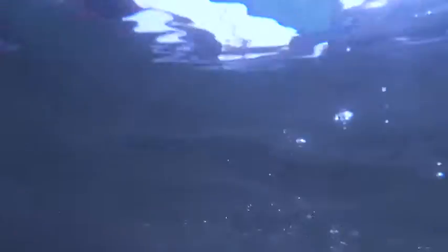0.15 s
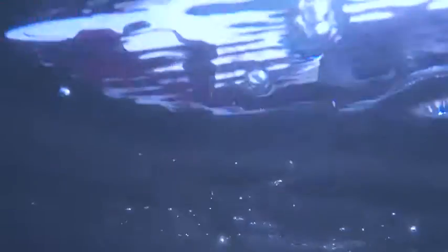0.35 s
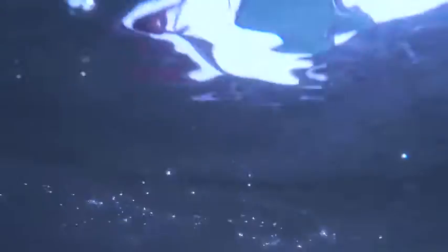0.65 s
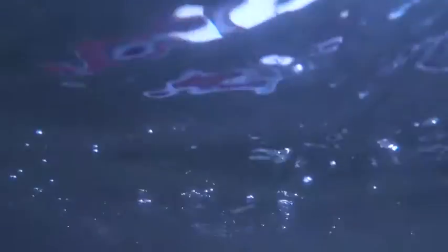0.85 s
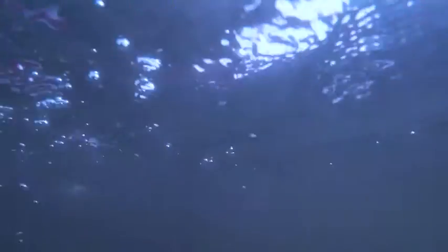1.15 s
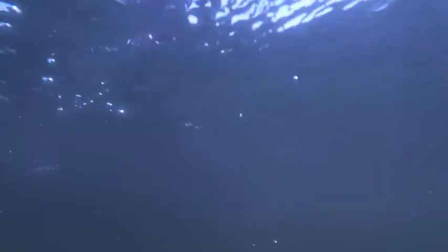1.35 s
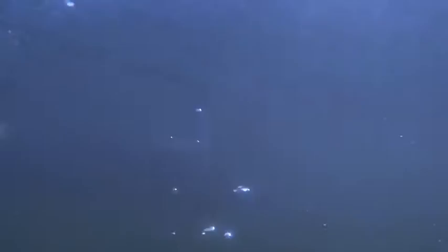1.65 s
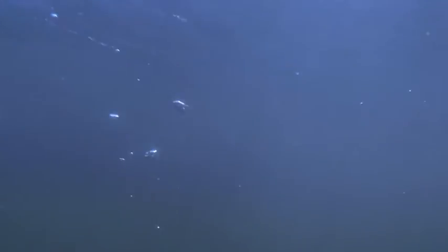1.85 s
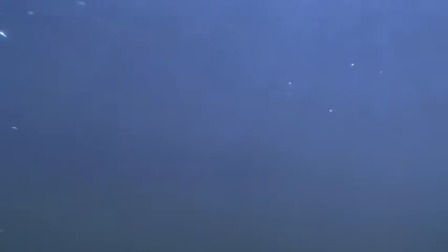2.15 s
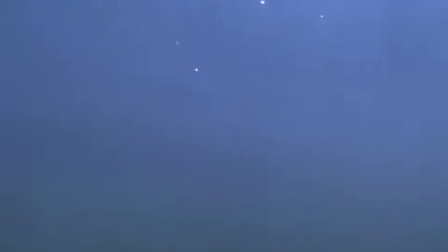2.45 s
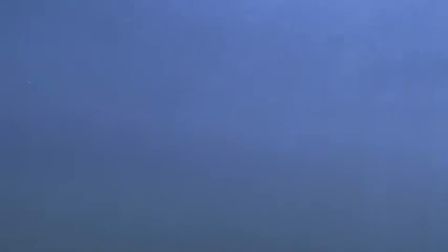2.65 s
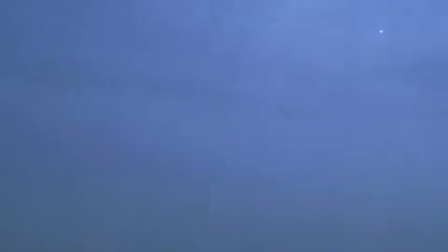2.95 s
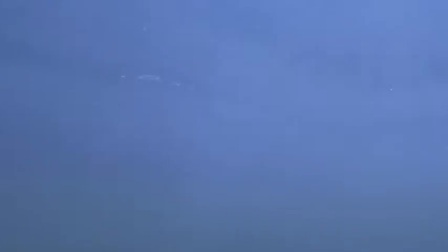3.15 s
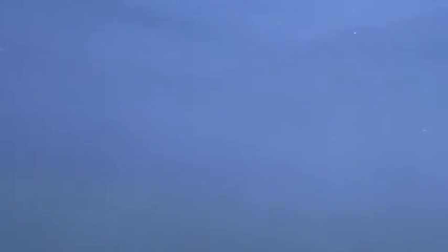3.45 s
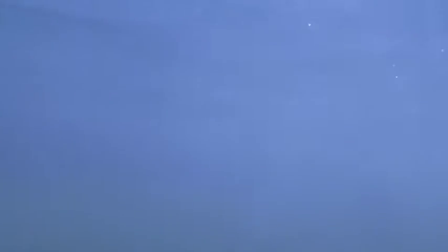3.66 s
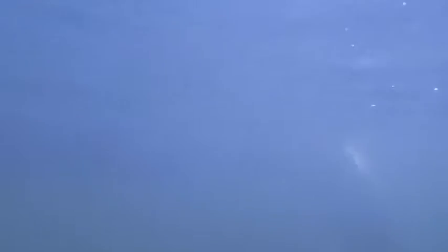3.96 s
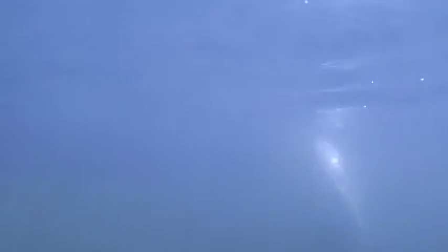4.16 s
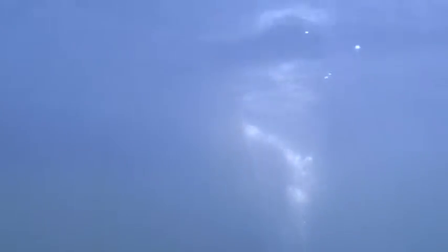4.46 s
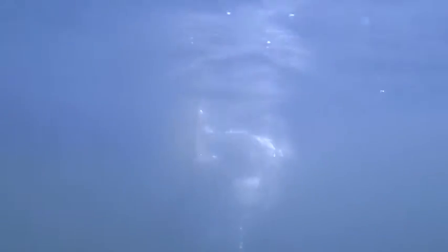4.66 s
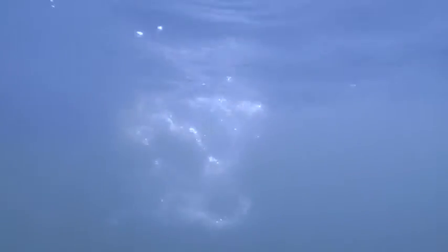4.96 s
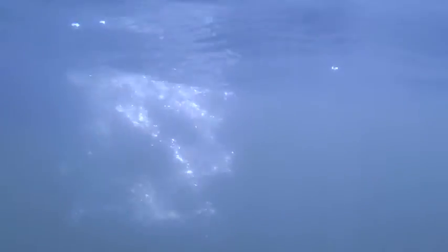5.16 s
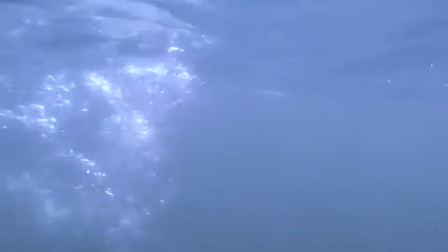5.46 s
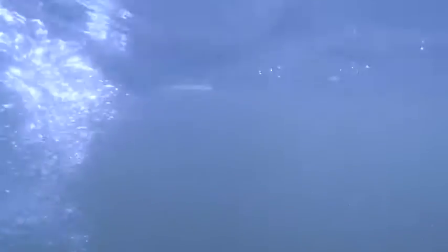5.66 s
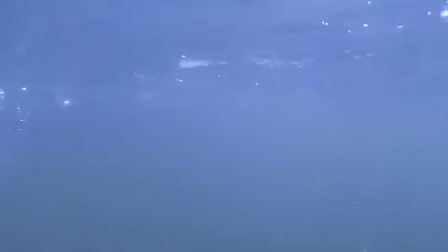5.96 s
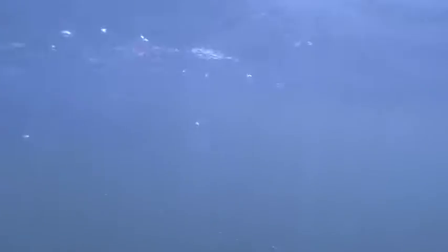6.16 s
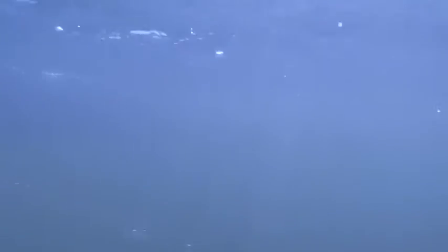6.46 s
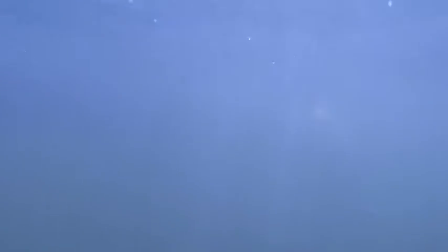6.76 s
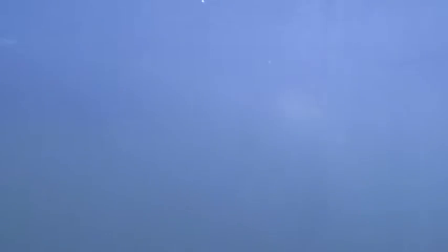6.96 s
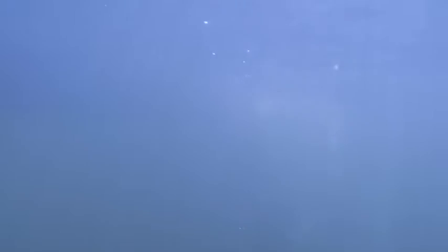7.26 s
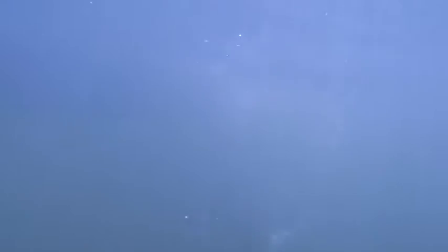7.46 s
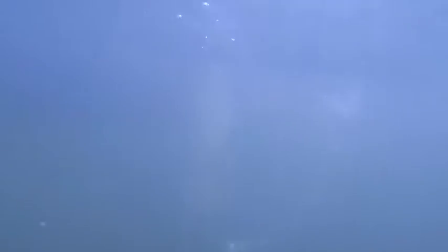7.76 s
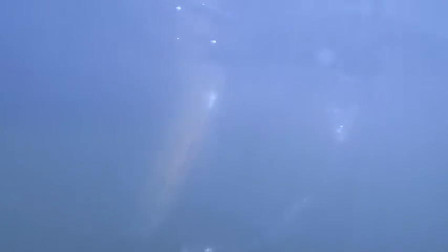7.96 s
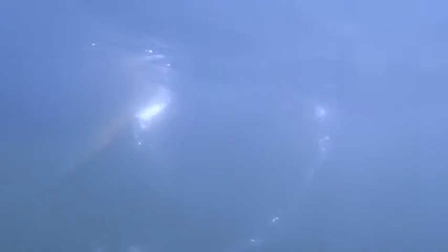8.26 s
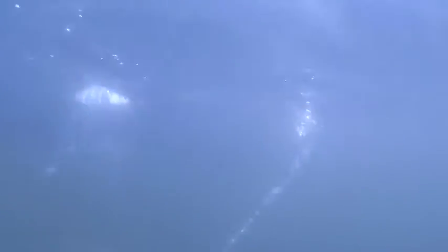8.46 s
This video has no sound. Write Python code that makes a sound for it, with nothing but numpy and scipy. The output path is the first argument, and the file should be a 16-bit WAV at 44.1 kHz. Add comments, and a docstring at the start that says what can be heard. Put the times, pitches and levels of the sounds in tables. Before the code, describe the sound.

Close, muffled and boxy underwater sound: round bubble plops, small high blips, dull gurgles and soft watery fizz, with knocks and ticks against the housing. The first half bubbles actively in surges, then thins to quiet streaming. A cracking click and the loudest thud break the calm; the water almost falls silent, then light ticks, clicks and increasingly dense bubbles swell through to the end.

```python
"""Bubbles ring one by one under water, close to a microphone in a sealed camera housing.
It is dragged through the wake beside a boat being paddled. Small blows knock and tick on the housing,
whose air space colours them and the gurgle with fixed resonances. Behind them the water streams,
crackles, fizzes and heaves as shaped noise and random bubbles, over faint preamplifier hiss and whine."""
import sys
import numpy as np
from scipy import signal
from scipy.fft import rfft, irfft, next_fast_len
from scipy.io import wavfile
from scipy.ndimage import uniform_filter1d, map_coordinates

SR = 44100
rng = np.random.default_rng(int(sys.argv[2]) if len(sys.argv) > 2 else 0)


def master_out(mix):
    """Clip the mix to full scale and print it as 16-bit PCM to the path in sys.argv[1]."""
    frames = np.transpose(np.atleast_2d(mix))
    ceiling = np.clip(frames, -1, 1)
    pcm = np.round(ceiling * 32767).astype(np.int16)
    wavfile.write(sys.argv[1], SR, pcm)


N = 379701
T = np.arange(N) / SR

# Blunt blows on the housing: start_s, level_db (push before the resonances)
KNOCKS = [(0.326, -42), (0.514, -36.5), (.639, -28.5), (1.054, -23.5), (1.429, -30), (1.515, -44),
          (1.644, -46.5), (1.708, -27.5), (1.802, -33), (1.859, -26), (1.987, -41), (2.147, -23.5),
          (2.475, -27.5), (2.623, -32.5), (2.901, -44), (3.421, -34), (3.574, -42.5), (3.853, -38.5),
          (5.058, -26), (5.207, -50.5), (5.709, -38.5), (5.797, -15.5), (6.392, -45), (6.59, -43.5),
          (6.762, -46), (6.9, -46.5), (7.159, -39), (7.91, -44), (7.939, -39.5), (7.998, -43), (8.281, -43),
          (8.389, -44), (8.443, -31.5), (8.521, -32.5)]
# Water streaming past: start_s, level_db (before its random ripple)
STREAM = [(0, -67), (.4, -77), (.8, -84), (1.5, -75.5), (1.9, -73), (2.04, -67.5), (2.17, -55.5),
          (2.3, -71), (2.86, -76.5), (2.95, -59), (3.1, -71), (3.9, -66), (4.2, -66), (4.8, -66),
          (5.6, -70.5), (6.1, -77.5), (6.2, -93), (6.8, -79.5), (7.6, -69.5), (7.9, -62.5), (8.2, -62),
          (8.61, -54)]
MID_DB = -67  # gurgle and crackle swing about this level of stirring or streaming


def amp(db):
    """Decibels to amplitude."""
    return 10 ** (np.asarray(db) / 20)


def unit(x):
    """Scale to rms 1."""
    return x / np.sqrt(np.mean(x ** 2) + 1e-20)


def along(points, hz):
    """Read a curve of (Hz, value) points on a log frequency axis."""
    f, v = np.transpose(points)
    return np.interp(np.log(hz + 1), np.log(f + 1), v)


def flow(index):
    """One column of the water's changing motion, per sample."""
    # Motion against the housing: start_s, heave_db, stirring_db, fizz_db
    motion = [(0, -33, -67, -85), (0.248, -37, -58, -81), (0.799, -36, -76, -82), (1.3, -38.5, -70.5, -84),
              (1.5, -36, -62.5, -80.5), (1.98, -36, -66, -81.5), (2.141, -32, -54, -78.5),
              (2.27, -40, -67, -81), (2.7, -35.5, -59, -81.5), (3.15, -39, -68.5, -82),
              (3.8, -38.5, -63.5, -81.5), (4.299, -39.5, -74, -81.5), (4.77, -37.5, -63.5, -79),
              (5.3, -35.5, -65.5, -80.5), (5.901, -40.5, -68, -81.5), (6.1, -45, -72, -83),
              (6.199, -48.5, -94, -105), (6.799, -45.5, -67.5, -94.5), (7.499, -41, -76.5, -82.5),
              (7.85, -35.5, -58, -81.5), (8.61, -37.5, -54, -80)]
    columns = np.transpose(motion)
    return np.interp(T, columns[0], columns[index])


def wobble(rate):
    """A smooth random curve with rate knots a second."""
    knots = rng.standard_normal(int(N * rate / SR) + 4)
    return map_coordinates(knots, [T * rate])


def filtered(x, response):
    """Filter x by a complex response of frequency."""
    m = next_fast_len(N + SR // 2)
    return irfft(rfft(x, m) * response(np.fft.rfftfreq(m, 1 / SR)), m)[:N]


def mode(f, hz, width_hz):
    """A causal resonance of peak gain 1."""
    return 1j * f * width_hz / (hz * hz - f * f + 1j * f * width_hz + 1e-9)


def housing(f):
    """The housing's air space: resonances summed with alternating sign."""
    # Resonances: centre_hz, width_hz, relative_level_db
    resonances = [(314, 71, 0), (930, 460, -2), (1300, 520, 2), (3000, 1500, -35)]
    return sum((-1) ** k * amp(db) * mode(f, hz, width) for k, (hz, width, db) in enumerate(resonances))


def add(out, s, sound):
    """Mix a short sound in at time s."""
    part = out[round(s * SR):][:len(sound)]
    part += sound[:len(part)]


def noise(spectrum, lumps_db, rate):
    """Coloured noise of rms 1 whose level comes in lumps."""
    lumpy = amp(lumps_db * wobble(rate)) * rng.standard_normal(N)
    return unit(filtered(lumpy, lambda f: amp(along(spectrum, f))))


def patchy(x, depth_db):
    """Random soft patches of gain over time and frequency, brought back to rms 1."""
    z = signal.stft(x, nperseg=512)[2]
    across_pitch = uniform_filter1d(rng.standard_normal(z.shape), size=3, axis=0)
    field = uniform_filter1d(across_pitch, size=5, axis=1)
    return unit(signal.istft(z * amp(depth_db * unit(field)), nperseg=512)[1][:N])


def stirred(over_db, dying_s):
    """An amplitude that rises quickly with every knock and dies away."""
    jolts, t = np.zeros(N), np.arange(SR // 2) / SR
    rise_s = 0.004
    shape = (1 - np.exp(-t / rise_s)) ** 2 * np.exp(-t / dying_s)
    for s, db in KNOCKS:
        add(jolts, s, amp(db + over_db) * shape)
    return jolts


def ring(hz, db, t60, rise, attack):
    """A bubble's damped sine: pitch shifts by the share rise over t60, level swells over attack cycles."""
    t = np.arange(int(t60 * SR) + 2) / SR
    swept_db = -30 * (t / (0.05 + 0.25 * t60)) ** 6  # a long ring is swept away before it dies
    swell = 1 - np.exp(-t * hz / attack)
    cycles = hz * t * (1 + rise * t / t60 / 2)
    return amp(db - 60 * t / t60 + swept_db) * swell * np.sin(2 * np.pi * cycles)


def swarm(count, centre_hz, spread, cycles, size_db):
    """Bubbles ringing at random times with log-normal pitch, a few much louder than the rest."""
    out = np.zeros(N)
    draws = rng.random((count, 2))
    for (u, big), (p, life) in zip(draws, rng.standard_normal((count, 2))):
        hz = min(centre_hz * np.exp(spread * p), SR / 6)
        db = size_db * min(-np.log(1 - big), 3.2)  # capped, so that no bubble towers over the rest
        t60 = cycles * np.exp(0.34 * life) / hz
        add(out, u * N / SR, ring(hz, db, t60, rise=0.18, attack=0.98))
    return out


def bubbles():
    """Breathing spheres of air, heard singly: big ones tend to climb in pitch, small ones to sag."""
    # Single bubbles: start_s, pitch_hz, level_db (before the lift below), t60_s
    single_bubbles = [(.001, 391, -31, 0.27), (0.019, 928, -49, 0.089), (0.036, 4560, -51, 0.013),
                      (.083, 2660, -62, 0.027), (.086, 377, -41, 0.037), (0.122, 890, -38.5, 0.066),
                      (.183, 318, -36.5, 0.27), (.194, 2840, -56, .018), (.238, 692, -53.5, 1),
                      (.292, 2830, -55, 0.041), (0.301, 3850, -48, 0.0095), (0.329, 1430, -42, 0.017),
                      (0.36, 1430, -58.5, .08), (.385, 1170, -39.5, 0.063), (.404, 3210, -37.5, 0.0083),
                      (.48, 784, -62.5, 0.52), (.52, 1195, -41, 0.057), (0.52, 2830, -55, 0.013),
                      (.566, 890, -52, 0.12), (0.627, 260, -36, 0.028), (.647, 1210, -24, 0.016),
                      (1.059, 346, -6.5, 0.046), (1.06, 1100, -30, 0.014), (1.061, 2320, -41.5, 0.007),
                      (1.077, 2950, -41, 0.0027), (1.238, 1680, -56.5, 0.026), (1.27, 1050, -38.5, 0.005),
                      (1.27, 2690, -50.5, 0.027), (1.361, 354, -48.5, 0.5), (1.427, 1180, -31, 0.0096),
                      (1.436, 791, -16.5, 0.072), (1.46, 780, -32, 0.063), (1.525, 777, -50.5, 0.075),
                      (1.558, 948, -42.5, 0.075), (1.594, 1000, -44.5, 0.072), (1.594, 1700, -45.5, 0.026),
                      (1.648, 1028, -28.5, .0079), (1.714, 420, -18, 0.062), (1.713, 685, -24.5, 0.058),
                      (1.714, 1290, -39, 0.032), (1.746, 422, -48, .17), (1.807, 340, -28, 0.17),
                      (1.808, 625, -38.5, 0.17), (1.862, 448.6, -29.5, 0.22), (1.896, 449.4, -34.5, 0.18),
                      (1.91, 2120, -56, .027), (1.927, 1120, -57.5, .042), (1.942, 2480, -64, 0.035),
                      (1.972, 1060, -63, 0.077), (2.002, 584, -46, 0.11), (2.033, 2180, -61, .025),
                      (2.035, 1117, -50, 0.076), (2.093, 1460, -47, .023), (2.11, 380, -37, 0.04),
                      (2.114, 1450, -46, 0.027), (2.138, 320, -42.5, 0.32), (2.147, 800, -42, 0.089),
                      (2.152, 1450, -29.5, 0.011), (2.177, 1580, -36, 0.041), (2.18, 3870, -38, 0.0067),
                      (2.241, 1006, -42.5, 0.05), (2.305, 1460, -53, 0.044), (2.305, 2340, -63, .02),
                      (2.322, 2500, -63.5, 0.023), (2.316, 443, -45, 0.19), (2.317, 780, -45, 0.079),
                      (2.46, 3300, -65, 0.02), (2.496, 540, -37, 0.054), (2.504, 1060, -50.5, 0.05),
                      (2.51, 2470, -54.5, 0.014), (2.515, 720, -39, 0.04), (2.552, 2840, -60.5, .026),
                      (2.592, 2680, -57, 0.021), (2.624, 282, -23.5, 0.044), (2.627, 1495, -30, 0.054),
                      (2.648, 1050, -19.5, 0.0046), (2.651, 3340, -31.5, 0.0049),
                      (2.668, 1176, -37.5, 0.06), (2.671, 2680, -49, .017), (2.714, 1660, -52, .028),
                      (2.74, 369.4, -44.5, 0.51), (2.742, 2120, -56, .027), (2.742, 617, -49.5, 0.11),
                      (2.78, 950, -35, 0.075), (2.826, 2190, -59, 0.034), (2.827, 1620, -53.5, .03),
                      (2.901, 2460, -49.5, 0.018), (3.063, 970, -47, 0.094), (3.18, 2200, -57, .015),
                      (3.185, 485, -54.5, 0.14), (3.185, 660, -47, 0.067), (3.247, 2460, -58, 0.033),
                      (3.341, 5330, -60.5, 0.013), (3.389, 972, -46.5, 0.12), (3.396, 1533, -42.5, 0.068),
                      (3.43, 1263, -29, 0.057), (3.447, 1150, -40, 0.061), (3.49, 615, -49.5, 0.086),
                      (3.582, 1124, -30.5, 0.09), (3.606, 2980, -51.5, 0.014), (3.615, 242, -46.5, 0.23),
                      (3.72, 620, -51, 0.26), (3.726, 845, -42.5, 0.051), (3.757, 1477, -48.5, 0.074),
                      (3.793, 218, -45.5, 0.23), (3.857, 233.5, -41.5, 0.36), (3.854, 1460, -47.5, 0.041),
                      (3.862, 526, -52.5, 0.34), (3.94, 322, -30, 0.031), (3.943, 559, -45, 0.13),
                      (3.982, 334, -39.5, 0.07), (3.988, 1219, -42, 0.064), (4.063, 500, -55, 0.39),
                      (4.132, 1380, -46.5, 0.026), (4.22, 2300, -62, .02), (4.36, 804, -55.5, 0.084),
                      (4.583, 1930, -58, 0.024), (4.78, 798, -56, 0.12), (5.063, 1263, -28, 0.019),
                      (5.064, 1695, -9, 0.012), (5.212, 3280, -53, 0.013), (5.35, 1600, -61, .05),
                      (5.585, 1670, -48.5, 0.019), (5.715, 1530, -25.5, .035), (5.716, 816, -40, 0.024),
                      (5.769, 324, -34.5, 0.037), (5.768, 7500, -44, 0.0072), (5.799, 263, -21, 0.033),
                      (5.805, 538, -5.5, .023), (5.802, 1016, -23, 0.036), (5.806, 1707, -29, 0.044),
                      (5.827, 545, -36.5, 0.026), (5.871, 1365, -27.5, 0.026), (5.905, 363, -43, .2),
                      (5.945, 4550, -49.5, 0.009), (5.974, 1020, -45.5, 0.065), (5.988, 2260, -47.5, 0.025),
                      (6.063, 1610, -61.5, 0.035), (6.114, 1470, -47.5, 0.012), (6.246, 1578, -70, 0.033),
                      (6.34, 1695, -73, 0.028), (6.251, 194, -65, 0.23), (6.592, 1346, -46, 0.02),
                      (6.593, 3040, -40, 0.0084), (6.674, 3090, -61.5, 0.023), (6.719, 1660, -51.5, 0.028),
                      (6.732, 3700, -56, 0.013), (6.767, 1586, -41, 0.018), (6.779, 2730, -36.5, 0.011),
                      (6.854, 1710, -55, 0.023), (6.89, 2100, -48.5, 0.035), (6.906, 564, -39.5, 0.044),
                      (6.921, 1043, -57, 0.071), (6.966, 1800, -56.5, .023), (6.985, 700, -53, 0.019),
                      (7.0, 1470, -66.5, 0.045), (7.032, 775, -59.5, 0.12), (7.164, 794, -34, 0.027),
                      (7.172, 677, -50, 0.16), (7.204, 396, -49, 0.32), (7.23, 1110, -51.5, 0.061),
                      (7.228, 810, -51.5, 0.11), (7.25, 3360, -57.5, 0.015), (7.258, 2150, -50, 0.013),
                      (7.268, 934, -53.5, 0.079), (7.286, 1930, -58, .029), (7.31, 1680, -62.5, 0.043),
                      (7.359, 347, -49, 0.52), (7.42, 763, -56, 0.1), (7.43, 1610, -60.5, 0.047),
                      (7.44, 602, -62, 0.16), (7.467, 1426, -53.5, 0.023), (7.567, 1160, -34.5, 0.0066),
                      (7.564, 1910, -43.5, .01), (7.59, 804, -53.5, 0.052), (7.63, 207, -51.5, 0.13),
                      (7.659, 1520, -55, 0.051), (7.686, 1050, -50, 0.039), (7.747, 924, -25.5, 0.0063),
                      (7.763, 2700, -55.5, .043), (7.78, 823, -18.5, 0.011), (7.781, 1494, -21.5, 0.019),
                      (7.833, 2660, -60, .023), (7.852, 1510, -49, 0.037), (7.916, 990, -20.5, 0.025),
                      (7.916, 2130, -16, .014), (7.946, 930, -31.5, .029), (7.948, 499, -43, 0.18),
                      (7.956, 3360, -63, .02), (7.99, 1098, -27.5, 0.038), (7.994, 2530, -33.5, 0.015),
                      (8.001, 249, -41.5, 0.67), (8.03, 2700, -56, .03), (8.032, 990, -52, 0.1),
                      (8.133, 306, -33, .32), (8.147, 3020, -58, 0.03), (8.157, 2570, -55, .027),
                      (8.157, 5860, -59, .009), (8.16, 871, -40, 0.078), (8.182, 291, -36, 0.065),
                      (8.199, 360, -44, 0.15), (8.219, 795, -51.5, 0.17), (8.248, 1127, -51.5, 0.19),
                      (8.252, 2170, -52.5, .032), (8.261, 3040, -63, .016), (8.289, 1565, -46.5, 0.052),
                      (8.297, 2830, -59, 0.026), (8.305, 791, -27, 0.057), (8.312, 1184, -26, 0.0078),
                      (8.364, 1130, -36.5, 0.046), (8.363, 2180, -39.5, 0.018), (8.38, 744, -50, 0.24),
                      (8.382, 1540, -42.5, 0.079), (8.423, 292, -37, 0.32), (8.433, 710, -44, 0.062),
                      (8.442, 1430, -47, 0.087), (8.448, 334.4, -25, 0.12), (8.451, 1340, -40.5, 0.029),
                      (8.454, 3100, -62, 0.037), (8.462, 355.5, -26.5, 0.2), (8.521, 2540, -42, .023),
                      (8.524, 923, -23.5, 0.044), (8.548, 714, -36, 0.08), (8.55, 1880, -42, 0.032),
                      (8.57, 370, -18.5, 0.14), (8.569, 1263, -33.5, 0.016), (8.595, 1210, -41.5, 0.045)]
    out = np.zeros(N)
    draws = rng.standard_normal((len(single_bubbles), 3))
    for (s, hz, db, t60), (glide, near, weak) in zip(single_bubbles, draws):
        rise = 0.13 * np.log(800 / hz) + 0.014 * glide
        add(out, s, ring(hz, db + 7, t60, rise, attack=0.64))
        if hz > 600:  # a neighbour of similar pitch, mostly weaker, beats against it
            near_hz = hz * np.exp(0.12 * near)
            add(out, s, ring(near_hz, db - 4 + 3 * weak, 0.7 * t60, rise, attack=1.5))
    # froth scatters a short rough tail
    t = np.arange(SR // 10) / SR
    froth = unit(amp(-60 * t / 0.042) * rng.standard_normal(len(t))) / np.sqrt(len(t))
    tail = signal.fftconvolve(out, froth)[:N]
    return out * amp(1.9 * wobble(90)) + amp(-10.0) * tail


def knocks():
    """A blunt blow pushes the wall once and sets off the housing resonances."""
    blows = np.zeros(N)
    push = np.hanning(round(0.0023 * SR))
    for s, db in KNOCKS:
        add(blows, s + 0.006124, amp(db) * push)
    return filtered(blows, lambda f: 3.78 * mode(f, hz=117, width_hz=690) + 5.36 * housing(f))


def ticks():
    """A sharp contact is a few milliseconds of crackle that favours the upper resonances."""
    # Contacts on the housing: start_s, level_db (before the trim and resonances below)
    contacts = [(0.0365, -50.5), (0.245, -39), (0.2996, -41.5), (0.4062, -37.5), (0.621, -44.5), (0.7, -43),
                (1.0627, -29.5), (1.1315, -43), (1.2717, -51.5), (1.4367, -37.5), (1.5945, -41.5),
                (1.6485, -29.5), (1.7137, -37.5), (2.06, -52), (2.092, -48), (2.112, -47), (2.139, -48),
                (2.153, -31.5), (2.1794, -38), (2.457, -53), (2.511, -53), (2.5517, -49), (2.5965, -41),
                (2.6268, -48), (2.6504, -48), (2.902, -46), (3.3399, -52.5), (3.4276, -49), (3.578, -46),
                (5.0654, -11.5), (5.2133, -35.5), (5.7014, -46.5), (5.7681, -28.5), (5.8019, -24.5),
                (5.8556, -33), (5.9429, -39), (6.112, -44.5), (6.4002, -34), (6.4238, -42), (6.5924, -30),
                (6.6753, -49), (6.7314, -45.5), (6.777, -54), (7.2532, -56), (7.3003, -46.5), (7.5657, -51),
                (7.588, -51), (7.7096, -43), (7.7827, -40), (7.834, -50), (7.9159, -17), (7.958, -48),
                (7.9918, -36.5), (8.155, -49.5), (8.251, -44), (8.2944, -44), (8.364, -61), (8.385, -46.5),
                (8.435, -52), (8.521, -42)]
    out, t = np.zeros(N), np.arange(SR // 50) / SR
    for s, db in contacts:
        add(out, s, amp(db - 3.5 - 60 * t / 0.012) * rng.standard_normal(len(t)))

    def response(f):
        return mode(f, hz=3696, width_hz=1100) + 4 * housing(f) * mode(f, hz=1520, width_hz=780)
    return filtered(out, response)


def gurgle():
    """Eddies patter on the housing wall, which rings dully; each knock leaves a short gurgle behind."""
    drops = (rng.random(N) < 70 / SR) * amp(4.0 * rng.standard_normal(N))  # about 70 taps a second
    patter = 0.6 * unit(drops) + amp(5 * wobble(90)) * rng.standard_normal(N)

    def response(f):
        dull = 1 / (1 + (f / 430) ** 6)
        return (0.42 * mode(f, hz=141, width_hz=1100) + housing(f)) * dull
    over_db, grows = 10, 0.79
    level_db = MID_DB + over_db + grows * (flow(index=2) - MID_DB) + 3 * wobble(7)
    return (amp(level_db) + stirred(over_db=-23, dying_s=0.038)) * unit(filtered(patter, response))


def crowd():
    """Small bubbles ring at random with the stirring, fainter while the water only streams."""
    small = unit(swarm(count=800, centre_hz=908, spread=0.4, cycles=56, size_db=3.0))
    small += amp(-16.5) * unit(swarm(count=900, centre_hz=2310, spread=0.4, cycles=63, size_db=5.0))
    calm = (T > 3.8) & (T < 5.65)
    return amp(flow(index=2) + 2 - 15 * calm) * small


def rush():
    """Water streams past as patchy coloured noise with a rippling level."""
    # Spectrum as the housing passes it on: frequency_hz, relative_db_per_hz
    rush_spectrum = [(300, -39.5), (560, -28), (700, -5.5), (810, 3), (1000, -4.5), (1150, -13), (1450, -7),
                     (1700, -8.5), (2000, -26.5), (3000, -37.5), (4000, -48.5)]
    water = patchy(noise(rush_spectrum, lumps_db=1.5, rate=40), depth_db=3)
    stream_db = np.interp(T, *np.transpose(STREAM))
    return amp(stream_db + 1.7 * wobble(8) + 2.5 * wobble(70)) * water


def crackle():
    """Froth crackles as a swarm of brief high bubbles, its level swinging wider than the stream's."""
    froth = unit(swarm(count=2300, centre_hz=2890, spread=0.5, cycles=19, size_db=7.5))
    over_db, grows = -12.5, 1.51
    stream_db = np.interp(T, *np.transpose(STREAM))
    return amp(MID_DB + over_db + grows * (stream_db - MID_DB)) * froth


def fizz():
    """Water fizzes past as high noise in fast lumps."""
    # Spectrum: frequency_hz, relative_db_per_hz
    fizz_spectrum = [(1500, -25), (2200, 0), (3300, -7.5), (4000, -12.5), (7300, -10), (8300, -24.5)]
    return amp(flow(index=3)) * noise(fizz_spectrum, lumps_db=1.3, rate=270)


def heave():
    """Turbulent pressure heaves on the housing in lumps, stirred by knocks; a few deep swings slow down."""
    # Spectrum: frequency_hz, relative_db_per_hz
    heave_spectrum = [(4.7, -29.5), (8.0, -3), (21, 5.5), (38, -4.5), (52, -8.5), (114, -24), (200, -31.5),
                      (260, -66.5), (440, -120)]
    # Swings: start_s, level_db (before the lift and build-up below), start_pitch_hz, t60_s
    swings = [(1.05, -49, 27.8, 0.34), (2.148, -5, 27.4, 0.3), (5.071, -21.5, 26.5, 0.54),
              (5.797, -12.5, 24, 0.43), (6.444, -27.5, 25.74, 0.62)]
    pressure = noise(heave_spectrum, lumps_db=2.5, rate=11)
    out = (amp(flow(index=1)) + stirred(over_db=-11, dying_s=0.07)) * pressure
    t = np.arange(SR // 2) / SR
    rise_s, slowing_s = 0.01, 0.09  # pitch halves after slowing_s
    build_up = 1 - np.exp(-t / rise_s)
    for s, db, hz, t60 in swings:
        cycles = hz * slowing_s * np.log1p(t / slowing_s)
        add(out, s, amp(db + 2.0 - 60 * t / t60) * build_up * np.sin(2 * np.pi * cycles))
    return out


def swells():
    """Low swells in the streaming water: bands of rumble that grow and fade."""
    # Swells: centre_s, half_length_s, centre_hz, level_db
    rumbles = [(4.846, .12, 113.3, -54.5), (5.274, .08, 145, -51.5)]
    out = np.zeros(N)
    for s, half_s, hz, db in rumbles:
        rumble = unit(filtered(rng.standard_normal(N), lambda f: mode(f, hz, 0.5 * hz) ** 2))
        out += amp(db) * np.exp(-((T - s) / half_s) ** 2 / 2) * rumble
    return out


def electronics():
    """Preamplifier hiss and a faint wavering whine that sinks with the fizz."""
    # Hiss spectrum: frequency_hz, relative_db_per_hz
    hiss_spectrum = [(300, 2), (7300, -11), (8300, -28)]
    # Whine: pitch_hz, level_db (before the offsets below)
    whine_tone = [(4317, -95.5)]
    (hz, db), = whine_tone
    sink_db = 0.8 * (np.minimum(flow(index=3), -84) + 84.5)
    tone = np.sin(2 * np.pi * hz * T + 0.6 * wobble(15))
    whine = amp(db + 3.5 + sink_db + 1.5 * wobble(20)) * tone
    return amp(-97.5) * noise(hiss_spectrum, lumps_db=-4, rate=1) + whine


def scene():
    """All sources as they meet at the microphone, from the bubbles back to the electronics."""
    wake = gurgle() + crowd() + rush() + crackle() + fizz()
    return (bubbles() + knocks() + ticks() + wake + heave() + swells() + electronics())[None]


def record(dry):
    """Loud peaks flatten softly; the treble falls away above 7.3 kHz and stops at 8.4 kHz."""
    soft = dry[0] / (1 + np.abs(dry[0] / 0.42) ** 8) ** (1 / 8)
    return filtered(soft, lambda f: amp(along([(7300, -0.5), (8300, -19.5)], f)) * (f < 8400))[None]


dry = scene()
out = record(dry)
master_out(out)
```